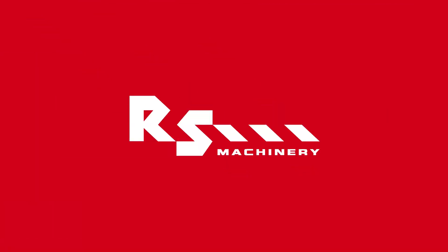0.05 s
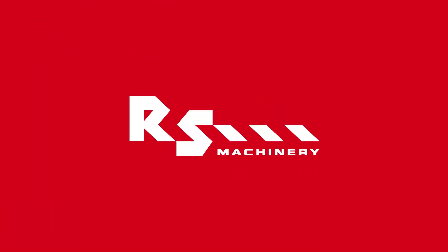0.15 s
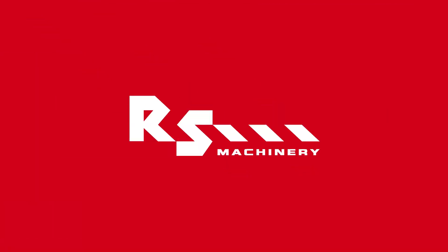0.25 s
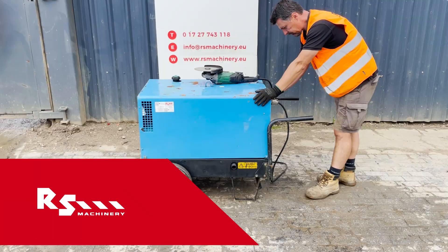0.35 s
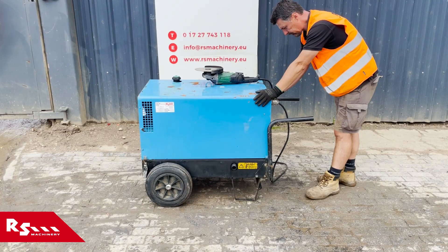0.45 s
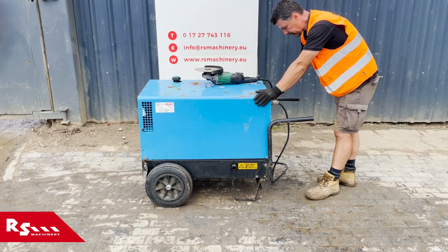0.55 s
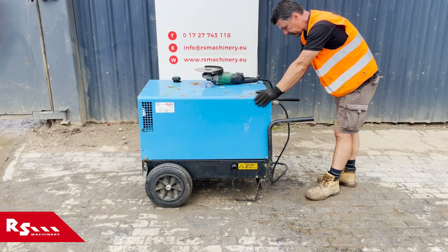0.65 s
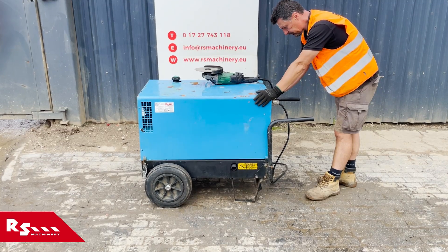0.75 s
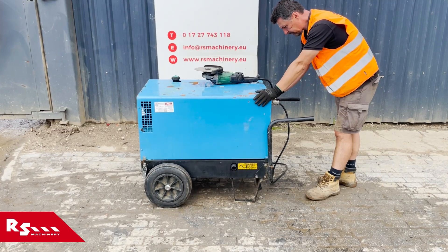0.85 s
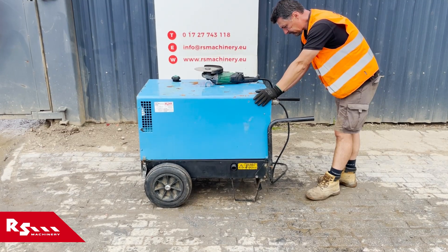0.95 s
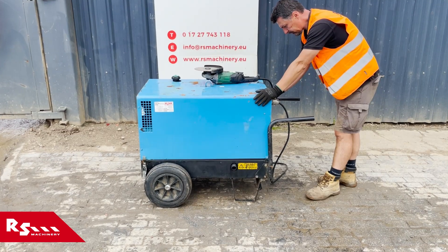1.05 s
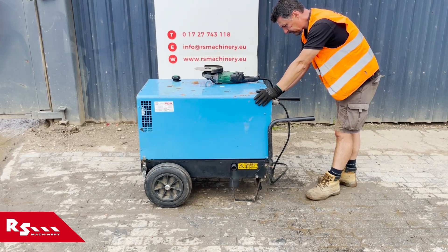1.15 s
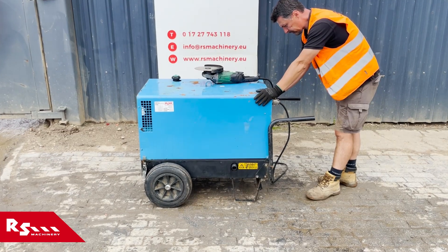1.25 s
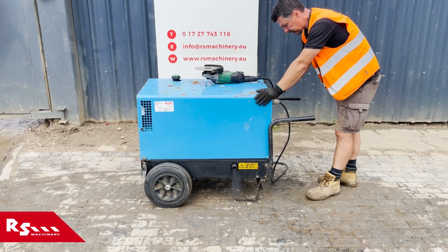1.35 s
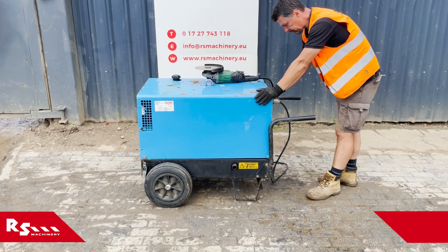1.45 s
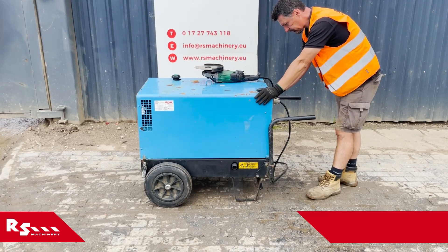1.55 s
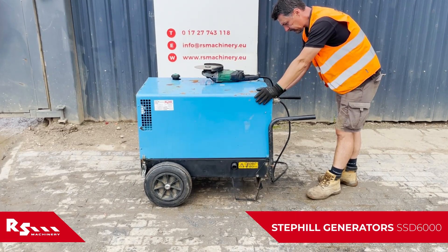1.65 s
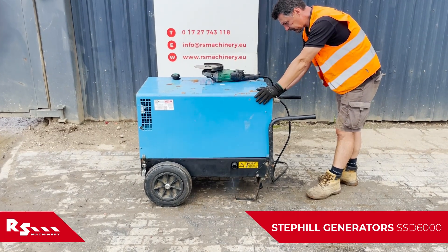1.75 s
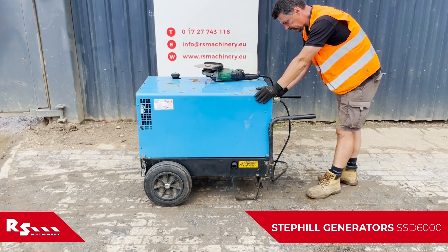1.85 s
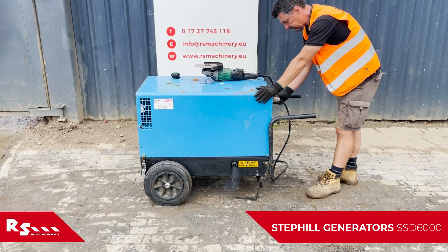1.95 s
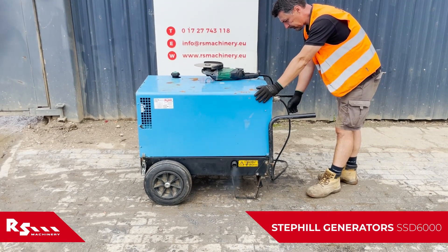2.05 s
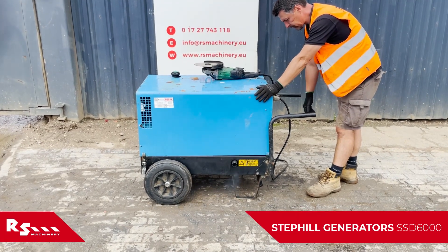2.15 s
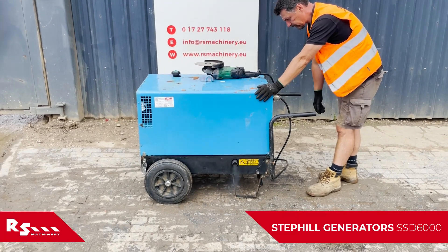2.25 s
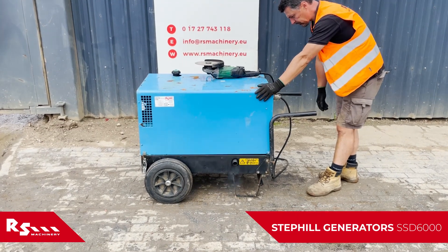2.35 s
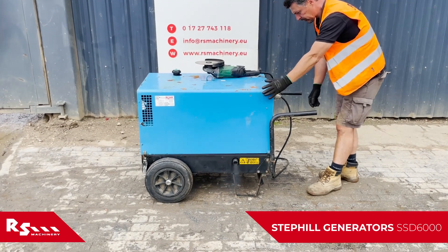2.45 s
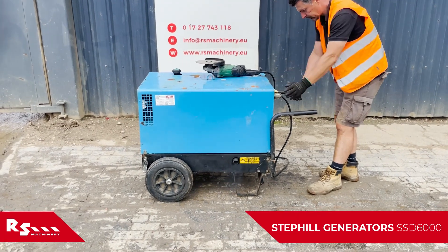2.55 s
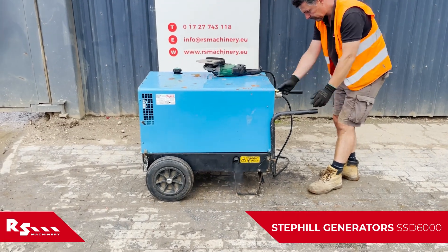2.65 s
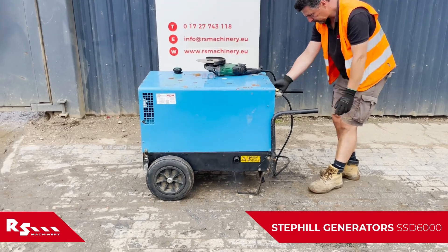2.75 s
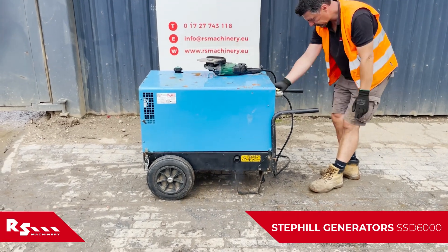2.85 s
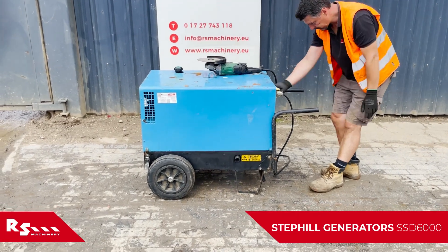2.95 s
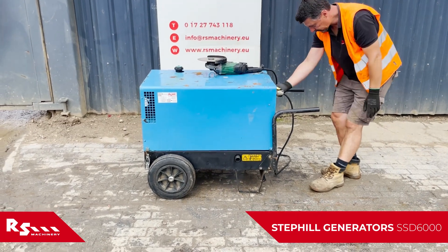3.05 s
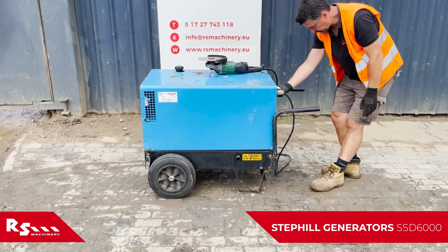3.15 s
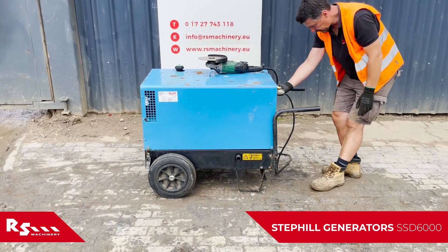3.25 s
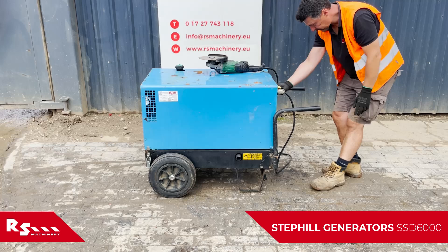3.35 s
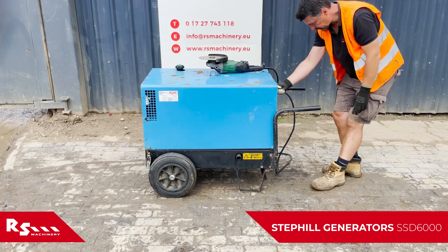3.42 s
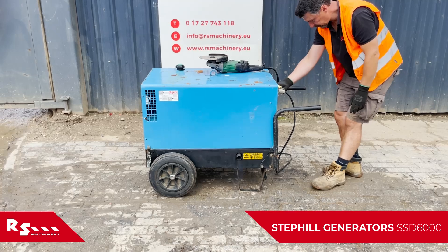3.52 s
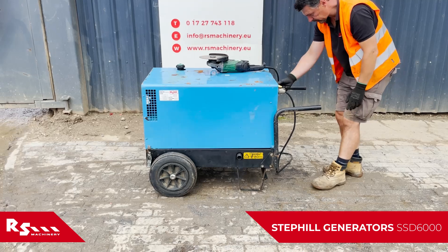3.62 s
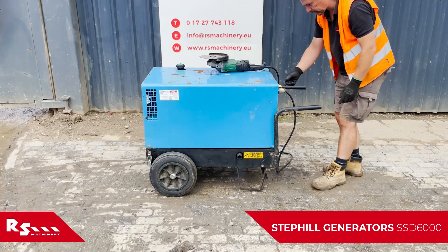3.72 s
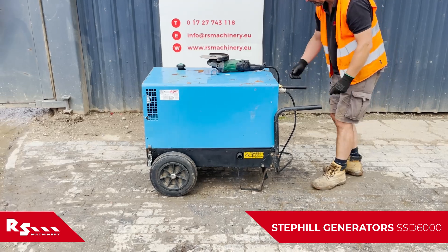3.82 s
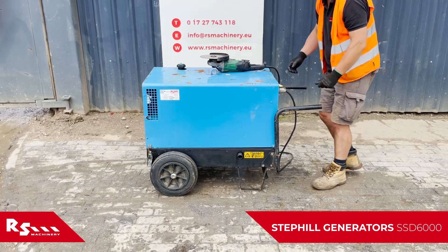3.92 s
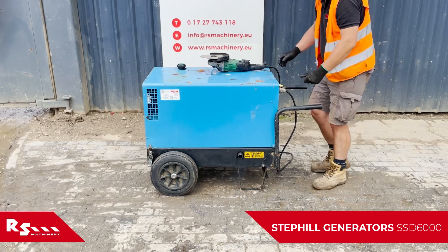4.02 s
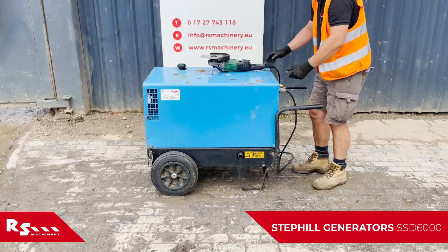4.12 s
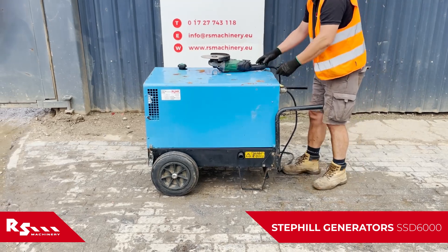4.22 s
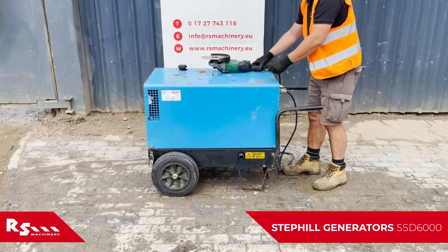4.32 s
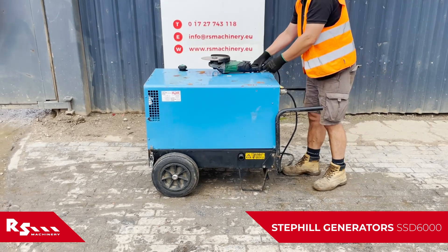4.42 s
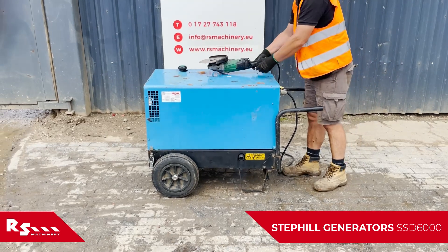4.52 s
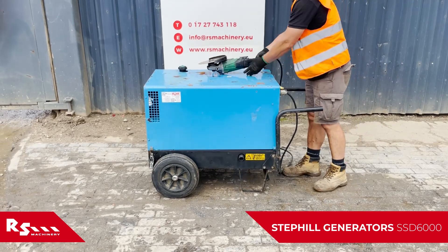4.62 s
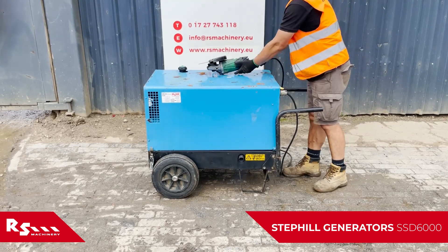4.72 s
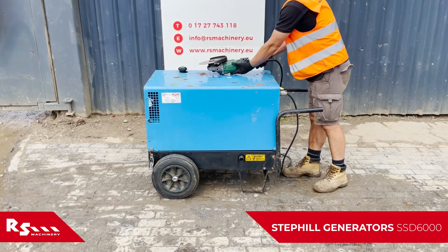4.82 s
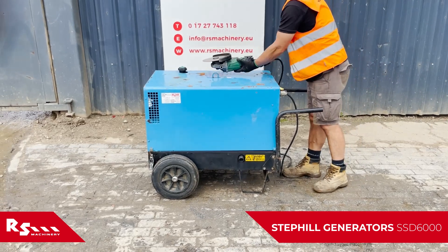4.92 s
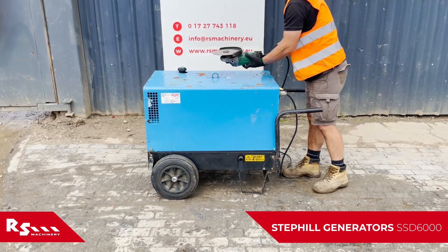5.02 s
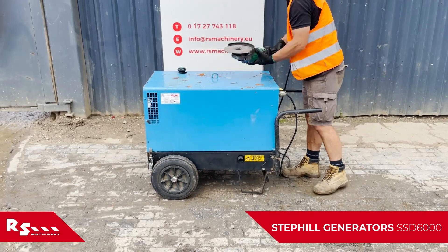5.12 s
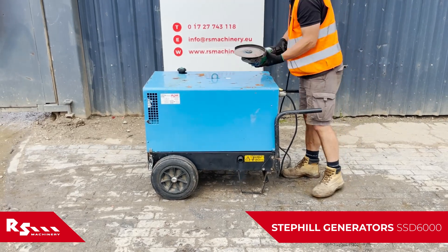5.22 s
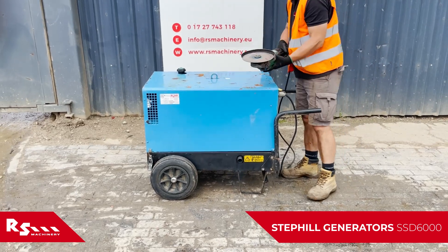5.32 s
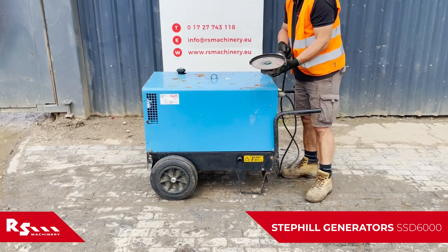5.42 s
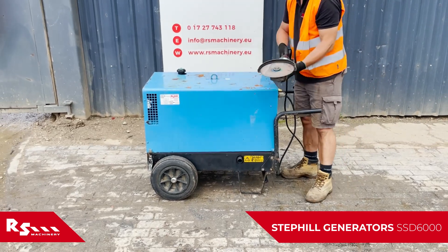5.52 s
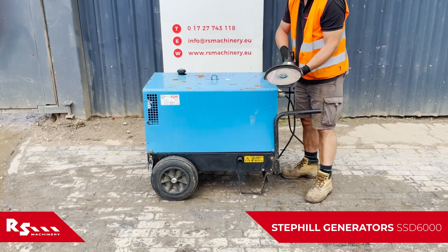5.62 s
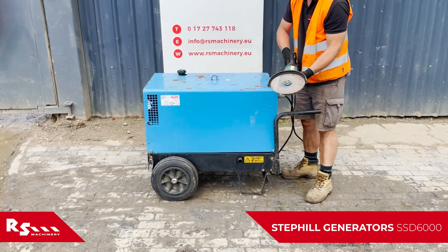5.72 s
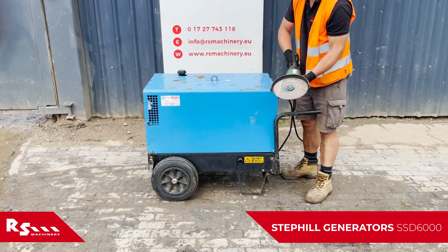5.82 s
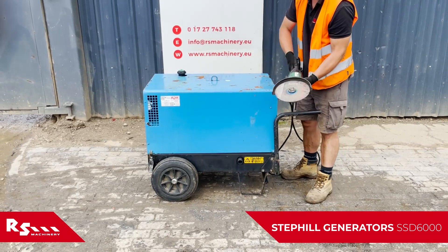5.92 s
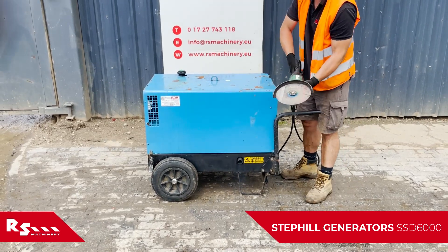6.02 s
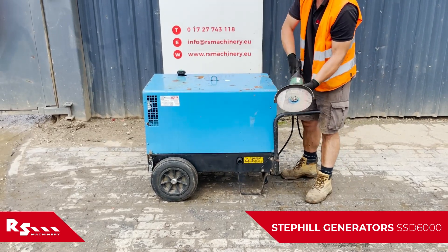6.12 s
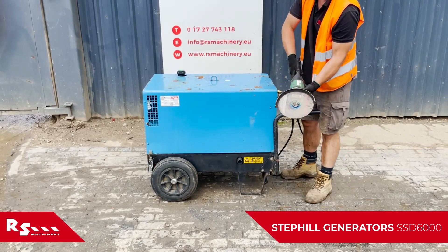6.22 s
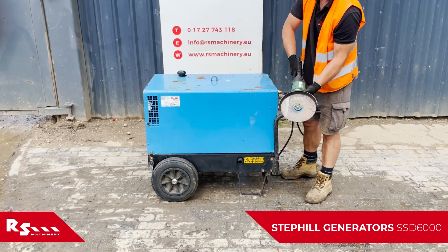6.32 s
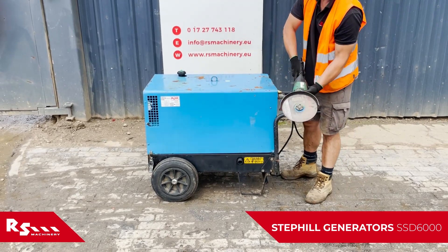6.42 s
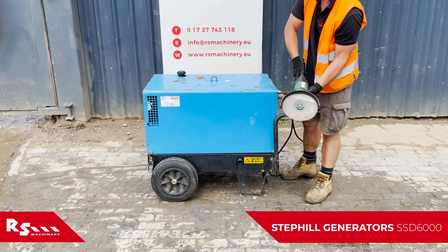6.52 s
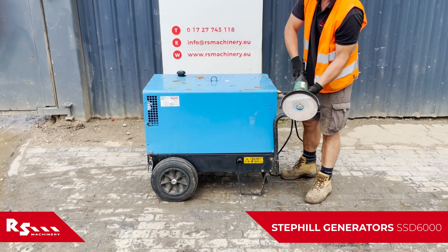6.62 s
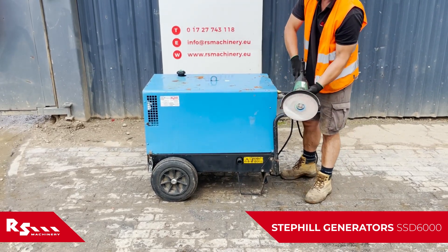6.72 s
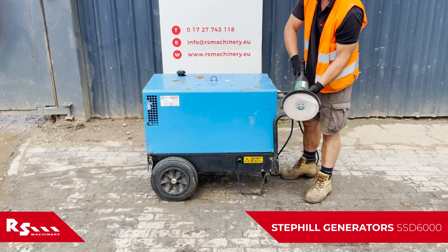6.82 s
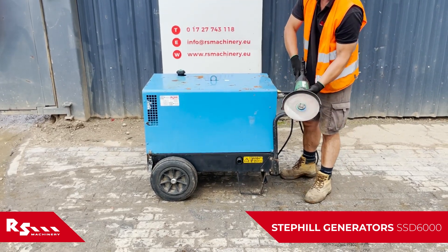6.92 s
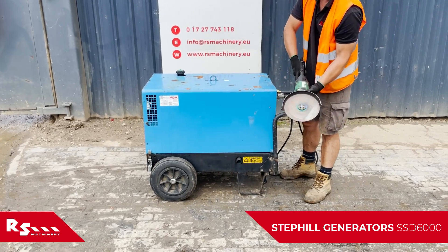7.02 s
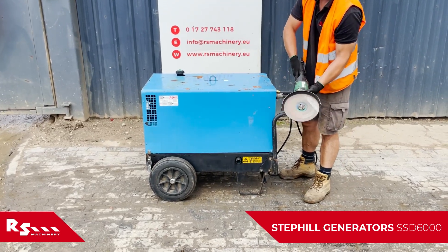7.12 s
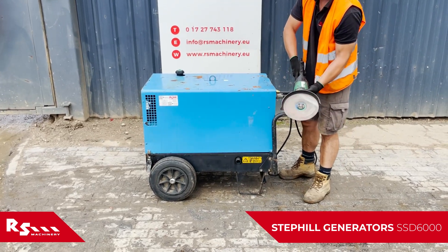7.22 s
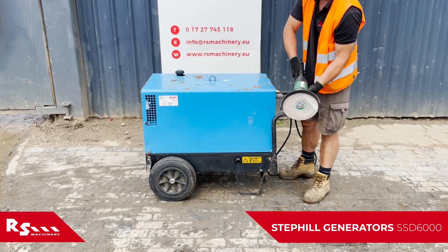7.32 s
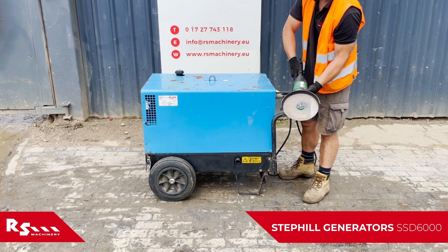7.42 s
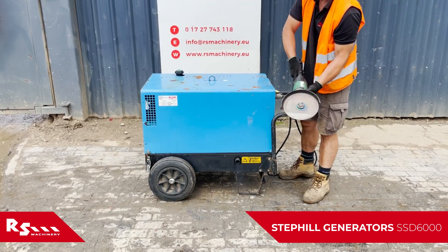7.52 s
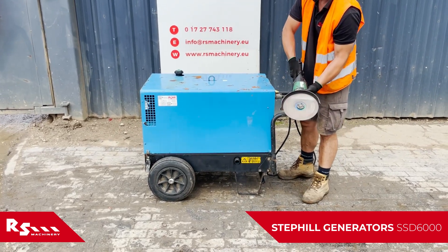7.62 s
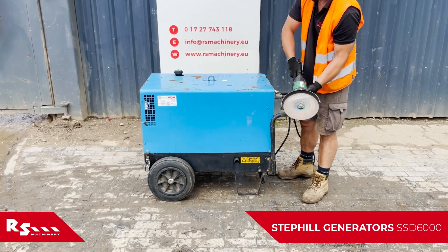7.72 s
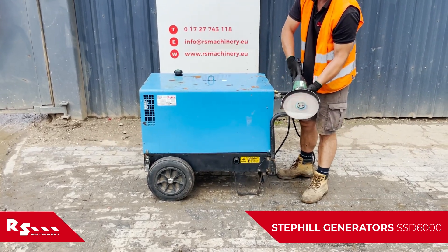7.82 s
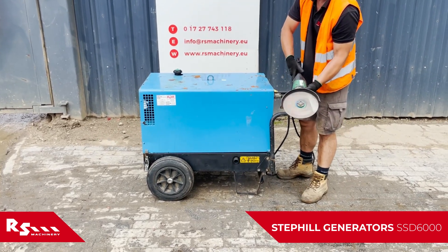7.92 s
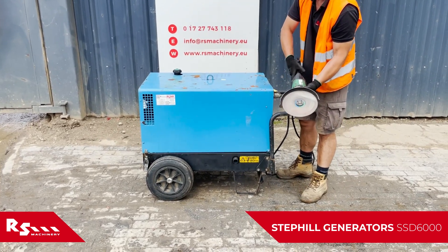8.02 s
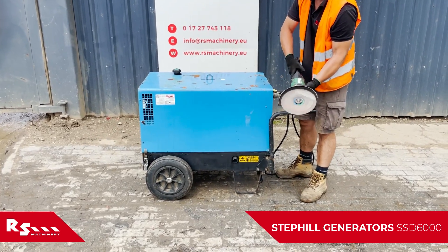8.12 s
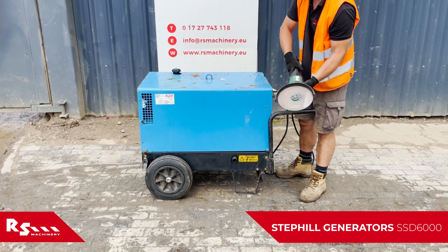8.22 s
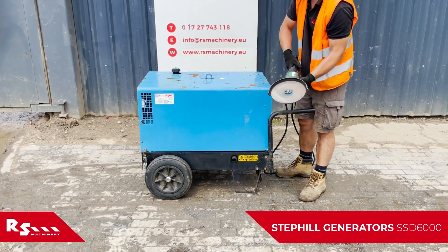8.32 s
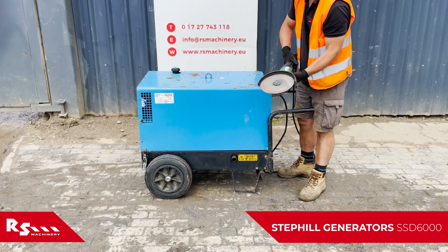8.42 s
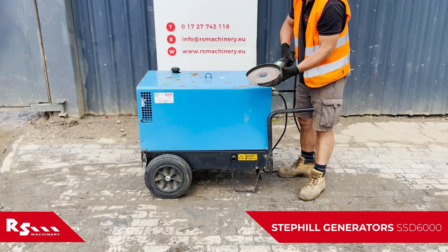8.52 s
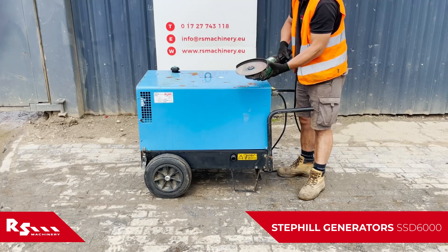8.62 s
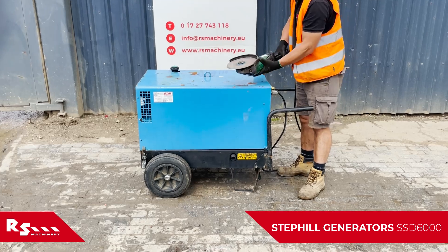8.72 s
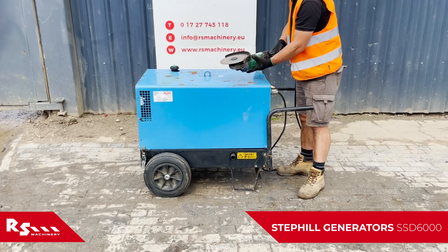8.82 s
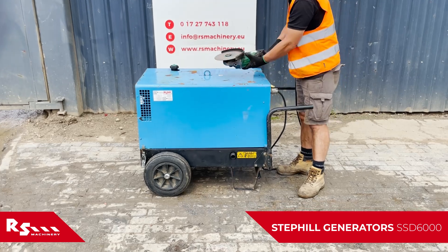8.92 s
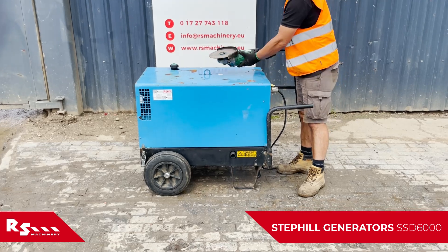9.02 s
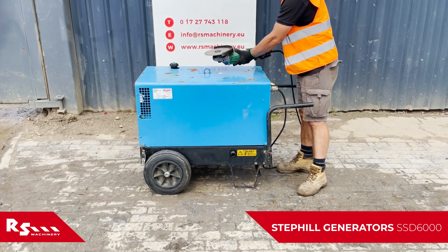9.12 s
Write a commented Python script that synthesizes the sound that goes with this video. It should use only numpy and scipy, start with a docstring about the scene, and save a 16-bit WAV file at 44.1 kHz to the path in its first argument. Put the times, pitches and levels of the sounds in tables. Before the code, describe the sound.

For the first 0.7 seconds a starter clunks and grinds fairly quietly. A single-cylinder diesel generator turns over with low pumping and quickening knocks, catches at about 1.9 seconds and reaches speed by 2.5. It runs on loudly and steadily: a deep booming exhaust, a fast hard clatter, ringing steel panels and a rush of fan air.

At 6.4 seconds an angle grinder starts with a rattling gear jolt and a rasp, whining upward for a third of a second, spinning freely without cutting. It coasts, with a few bright metal ticks between 7.0 and 7.4. A second blip from 7.4 to 7.8 pushes the whine higher. The engine sags slightly under each blip and recovers. The grinder's thin whine and airy hiss slowly fall, with a soft low thump near 8.4, while the generator continues to the end, just past 9 seconds. Heard nearby, outdoors, in stereo.

```python
"""A starter clunks and grinds; a single-cylinder diesel generator catches and settles on its governor.
Its exhaust booms and each firing knocks the block and steel canopy. An angle grinder plugged into it is
blipped twice in free air: its gears jolt, its motor rasps, it whines up and coasts down, and each time
the load pulls the engine speed down a little. Heard outdoors through two nearby microphone ports."""
import sys
import numpy as np
from scipy import signal
from scipy.fft import rfft, irfft, next_fast_len
from scipy.io import wavfile
from scipy.ndimage import map_coordinates

SR = 44100
rng = np.random.default_rng(int(sys.argv[2]) if len(sys.argv) > 2 else 0)


def wrap_up_sound(samples):
    """Save the sound to the file named by the first command line argument, as 16-bit audio."""
    columns = np.atleast_2d(samples).T
    # keep every value between -1 and 1, then stretch to whole-number steps
    tamed = np.clip(columns, -1, 1)
    steps = np.round(tamed * 32767).astype(np.int16)
    wavfile.write(sys.argv[1], SR, steps)


N = 403956

# grinder trigger pulls: on_s, off_s, rasp_db, air_db, engine_sag_hz
TRIGGER = [(6.428, 6.726, -26.5, -26.5, 1.41), (7.405, 7.809, -25.5, -23, .81)]
GOVERNED_HZ, FREE_WHINE_HZ = 25.5, 10867  # engine firing rate, grinder whine at free speed
PUMP_AT_S, CATCH_AT_S, SETTLE_AT_S, SETTLE_S = .87, 1.88, 2.28, 3.2
JOLT_DB, RATTLE_DB, RATTLE_FALL_DB_PER_S = -16.5, -23, 46


def engine_speed():
    """Firing rate in Hz: sags under the grinder's load until the governor brings it back."""
    # unloaded run-up: time_s, firing_hz
    run_up = [(0, 9.75), (.65, 9.17), (1, 12.34), (1.5, 17.95), (2, 23.08), (2.4, 24.89), (3, 25.27),
              (4.5, 25.27), (6.4, 25.45), (9.16, 25.53)]
    recover_s = .5
    sag_hz = sum(drop_hz * ramp(on, off - on) * fade(off, recover_s) for on, off, _, _, drop_hz in TRIGGER)
    return np.interp(clock(), *np.transpose(run_up)) - sag_hz


def exhaust(turns, speed):
    """The cranked engine shakes and pumps; once it fires, low orders boom against fixed drones."""
    # exhaust lines: firing_multiple, level_db
    orders = [(2, -9.5), (3, 1.5), (4, -22.5), (5, -28.5), (6, -16), (9, -22.5), (10, -30), (11, -37.5)]
    # low thumps, the first at the catch: peak_s, level_db
    thump_times = [(1.93, -29.5), (8.38, -21)]
    # canopy rumble: freq_hz, density_db
    rumble_spectrum = [(30, -23), (55, 10), (90, -5.5), (125, -5), (180, 0.5), (245, 1.5), (320, -10),
                       (560, -11), (800, -48), (2000, -70)]
    lead_rad = 1.18 * fade(4.05, .99) * np.array([[-.5], [.5]])  # bass starts wide, right leading
    caught = ramp(CATCH_AT_S, .018)
    shake = amp(-36 - 13.5 * clock())  # starter's first kick
    cranking = (1 - caught) * (shake + amp(-35.5) * ramp(PUMP_AT_S, .24))
    running = caught * amp(-13 - 2.5 * fade(SETTLE_AT_S, SETTLE_S)) * speed ** 2.4
    thumps = hits(thump_times, rise_s=.033, decay_s=.11)

    valve_turns = turns - .46 + lead_rad / (2 * np.pi * 3)  # opens after the knock
    boom = amp(-.97) * running * unit(lines(valve_turns, orders, waver_db=.5, spread_rad=2))
    beat = (amp(-2.5) * cranking + amp(-11.5) * running) * drone(61, wander_rad=1, lead_rad=lead_rad)
    pumping = amp(-3) * cranking * noise([(30, -35), (55, -11), (75, 2), (110, 7), (250, -41)])

    blur = unit(ring(noise([(60, -17), (105, 0), (135, -1), (200, -42)]), [(124.5, 17, 0)]))
    swell_db = 5.5 * np.exp(-((clock() - 2.7) / .84) ** 2)  # as the engine reaches speed
    hollow_gain = amp(-4) * cranking + amp(-33.5 + swell_db + 2.6 * wobble(2.02)) * caught
    hollow_gain += amp(-7) * thumps
    hollow = hollow_gain * (drone(121.5, wander_rad=.92, lead_rad=lead_rad) + amp(-4.5) * blur)

    puffs = strokes(turns, rise_s=.0013, decay_s=.016, scatter_db=1.5, uneven_db=.5)
    rumble_gain = amp(-27.5 - 4 * fade(SETTLE_AT_S, 1) - 1.3 * (1 - caught)) * speed ** 1.16
    rumble = np.hypot(rumble_gain, amp(-8.5) * thumps) * unit((.49 + puffs) * noise(rumble_spectrum))
    analytic = signal.hilbert(pumping + rumble, next_fast_len(N))[:, :N]
    return boom + beat + hollow + np.real(analytic * np.exp(1j * lead_rad))


def clatter(turns, speed):
    """Each combustion knock rings block and panels, over the rush of gears and cooling fan."""
    # combustion knock: freq_hz, density_db
    knock_spectrum = [(200, -16), (600, -2.5), (1100, 3), (1800, -1.5), (3000, 1.5), (4000, -3), (5000, -4),
                      (5600, -12), (8500, -7), (11300, -8), (13000, -23), (15500, -38)]
    # block and cover: freq_hz, width_hz, gain_db
    block_modes = [(2740, 200, -3), (3047, 145, 5), (3780, 145, 6), (4885, 180, 3), (7120, 770, -4)]
    # canopy panels: freq_hz, width_hz, gain_db
    panel_modes = [(1409, 28, 5.5), (1861, 18, -0.5), (2847, 144, -7.5), (4010, 140, -25), (4960, 28, -30)]
    # gears and fan: freq_hz, density_db
    rush_spectrum = [(166, -20.5), (500.0, -1.5), (800.0, -2.5), (1100.0, -6), (1250.0, -13),
                     (1700.0, -13.5), (2200.0, -12.5), (3000.0, -14.5), (4000.0, -19), (5000.0, -20),
                     (5600.0, -25), (8500.0, -21), (11300.0, -29.5), (13000.0, -35), (15500.0, -50)]
    turning = ramp(.27, .65)
    full_fuel = ramp(1.09, .18) * fade(2.15, .18)  # until the governor cuts back
    hardening_db = (6 + 3.5 * ramp(CATCH_AT_S, .15)) * full_fuel
    force = turning * amp(-34 - 3.5 * fade(SETTLE_AT_S, SETTLE_S) + hardening_db) * speed ** .16
    grit = amp(2.2 * wobble(700))
    slaps = grit * strokes(turns, rise_s=.0042, decay_s=.0069, scatter_db=1.1, uneven_db=0)
    knock = noise(knock_spectrum)
    block = amp(-4.5 + 1.8 * full_fuel) * unit(ring(noise(), block_modes))
    blows = strokes(turns, rise_s=.0045, decay_s=.014, scatter_db=-1, uneven_db=-.5)
    panels = amp(-43) * unit(ring(force * amp(-4 * full_fuel) * blows * noise(), panel_modes))
    rush = turning * amp(-36 + .7 * full_fuel + 1.7 * wobble(250)) * speed ** .91 * noise(rush_spectrum)
    return force * slaps * (knock + block) + panels + rush


def starter():
    """The starter gear clunks and grinds, with a faint hum and whistle, until the engine takes over."""
    # gear clunks: peak_s, level_db
    clunk_times = [(.068, -34.5), (.205, -37), (.256, -33.5), (.346, -34.5), (.42, -36.5), (.492, -41.5),
                   (.524, -43), (.636, -39)]
    # gear grinding: freq_hz, density_db
    crank_spectrum = [(40, -31), (120.0, -9), (250.0, -13), (400.0, -17.5), (700.0, -4), (1100.0, -13),
                      (2000.0, -17.5), (3800.0, -20), (5000.0, -23.5), (5600.0, -25), (8500.0, -22.5),
                      (11800.0, -30), (13000.0, -41), (15500.0, -51)]
    blows = hits(clunk_times, rise_s=.011, decay_s=.022)
    grind_gain = np.hypot(amp(-43), amp(.5) * blows) * fade(1, 1)
    grind = grind_gain * amp(1.9 * wobble(150)) * noise(crank_spectrum)
    whistle = amp(-64.5) * unit(ring(noise(), [(11600, 390, 0)]))
    hum = amp(-50.5) * ramp(PUMP_AT_S, .08) * drone(392, wander_rad=3.3, lead_rad=0)
    clunks = amp(-6) * blows * unit(ring(noise(crank_spectrum), [(730, 150, 0)]))
    return grind + clunks + (whistle + hum) * fade(1.4, .2)


def grinder(turns):
    """The motor pulses on every half wave of the supply; its whine is weaker under power."""
    whine_hz = spindle()
    half_waves = np.cos(2 * np.pi * turns * 4)
    power = sum(amp(db) * ramp(on, .0048) * fade(off, .022) for on, off, db, *_ in TRIGGER)
    driven = power * rasp(whine_hz, half_waves) + jolt(half_waves)
    return driven + fan_and_guard(whine_hz) + amp(-10 * power / power.max()) * whine(whine_hz)


def spindle():
    """Whine pitch in Hz: climbs toward free speed under power, coasts down slowly."""
    spin_up_s, coast_s = .22, 4.65
    t, hz = clock(), np.zeros(N)
    for on, off, *_ in TRIGGER:
        gap_hz = FREE_WHINE_HZ - hz[round(on * SR)]
        powered_hz = FREE_WHINE_HZ - gap_hz * np.exp(-np.clip(t - on, 0, off - on) / spin_up_s)
        hz = np.where(t < on, hz, powered_hz * np.exp(-np.maximum(t - off, 0) / coast_s))
    return hz


def rasp(whine_hz, half_waves):
    """Motor noise and a gritty, climbing gear tone, chopped by the supply."""
    # driven motor and gears: freq_hz, density_db
    drive_spectrum = [(233, -30), (700.0, -4), (1100.0, -5), (1500.0, 0), (2500.0, -6), (3600.0, -3.5),
                      (4200.0, -2.5), (5000.0, -7), (5700.0, -32), (8500.0, -17), (13000.0, -48)]
    mesh = noise(drive_spectrum)
    mesh += amp(-.5) * unit(ring(noise(), [(3630, 56, -.92), (3890, 57, -.21), (4170, 44, -1)]))
    tooth_hz = .44 * whine_hz * (1 + .0324 * wobble(400))
    buzz = np.sqrt(2) * np.sin(2 * np.pi * np.cumsum(tooth_hz) / SR)
    mesh += amp(-5) * np.clip(whine_hz / 7500, 0, 1) ** 6 * buzz
    return unit(amp(2.6 * half_waves + 3.3 * wobble(500)) * mesh)


def jolt(half_waves):
    """Gears rattle and ring the disc as the motor snatches it from rest."""
    # disc and guard: freq_hz, width_hz, gain_db
    disc_modes = [(609, 23, -0.5), (790, 49, -11.5), (1490, 50, -5.5), (1900, 73, -9), (2800, 37, -15),
                  (3930, 54, -14), (4650, 210, -25)]
    start_s = TRIGGER[0][0]
    snatch = amp(JOLT_DB) * fade(start_s + .09, .04)
    rattle = amp(RATTLE_DB - RATTLE_FALL_DB_PER_S * np.maximum(clock() - start_s, 0))
    envelope = np.sqrt(ramp(start_s, .019)) * np.maximum(snatch, rattle)
    teeth = amp(2 * half_waves) * noise([(250, -28), (550, 1), (4500, -2), (6000, -16), (15000, -40)])
    growl = noise([(300, -25), (600, -4), (1100, -5.5), (1500, 7.5), (2000, -8), (2500, -6),
                   (5000, -17), (7000, -24), (11000, -26), (15000, -56)])
    return envelope * (amp(-2.5) * unit(ring(teeth, disc_modes)) + amp(.88 * half_waves - 1) * growl)


def fan_and_guard(whine_hz):
    """Cooling air and guard ring follow spindle speed; both drop as the tool is turned away."""
    # cooling air: freq_hz, density_db
    air_spectrum = [(266, -21), (800.0, -1), (1150.0, -5.5), (1450.0, -1), (1750.0, -0.5), (2100.0, -6.5),
                    (2600.0, -3.5), (4300.0, -0.5), (5200.0, -8.5), (5700.0, -13), (8500.0, -3.5),
                    (11500.0, -10.5), (13000.0, -22), (15500.0, -29)]
    speed, away = whine_hz / FREE_WHINE_HZ, ramp(8.66, .28)
    air_db = TRIGGER[0][3]
    for on, off, _, db, _ in TRIGGER[1:]:
        air_db = air_db + (db - air_db) * ramp(on, off - on)
    flutter_db = .83 * wobble(28) + .52 * wobble(400)
    air = amp(air_db + .5 - 3 * away + flutter_db) * speed ** 1.75 * noise(air_spectrum)
    vibration = noise([(700, -16), (1400, 1), (2100, 2), (5000, -18)])
    guard = unit(ring(vibration, [(1446, 51, 0), (2033, 47, -3.5)]))
    return air + amp(-33 - 2 * away + 2.1 * wobble(25)) * speed ** 1.44 * guard


def whine(hz):
    """Fluttering armature and gear tones swell as they cross housing resonances."""
    # armature and gear tones: whine_multiple, level_db
    partials = [(.44, -17), (.589, -17), (0.999, -1.5)]
    housing = [(8600, 130, 14), (4300, 250, 12), (5700, 400, -9)]  # freq_hz, half_width_hz, gain_db
    housing_db = lambda f: sum(db / (1 + ((f - centre) / width) ** 2) for centre, width, db in housing)
    phase = 2 * np.pi * np.cumsum(hz * (1 + .0038 * wobble(300))) / SR
    flutter_db = 2.2 * wobble(12)
    tones = sum(amp(db + housing_db(k * hz) + flutter_db) * np.sin(k * phase) for k, db in partials)
    return amp(-29.5) * (hz / FREE_WHINE_HZ) ** 1.4 * tones


def ticks():
    """Short, bright ticks of metal while the grinder coasts."""
    # ticks: start_s, level_db
    tick_times = [(7.018, -27), (7.108, -37), (7.302, -27), (7.381, -29)]
    t, decay_s = clock(), .0058
    blows = sum(amp(db) * (t > s) * np.exp(-np.abs(t - s) / decay_s) for s, db in tick_times)
    return blows * unit(ring(noise(), [(9000, 380, 1), (3610, 870, 2)]))


def canopy_hum(turns):
    """Canopy and alternator hum at high engine orders, growing as the engine settles."""
    # hum lines: firing_multiple, level_db
    orders = [(7, -30.5), (8, -38), (12, -47.5), (13, -44), (15, -45.5), (16, -49), (17, -49), (18, -42.5),
              (20, -54.5), (22, -37), (23, -43.5), (24, -53)]
    gain = amp(-1.5 - 3.5 * fade(SETTLE_AT_S, SETTLE_S)) * ramp(1.65, .86)
    return gain * lines(turns, orders, waver_db=1.5, spread_rad=1.2)


def lines(turns, orders, waver_db, spread_rad):
    """Wavering shaft-locked lines; pipe and panels delay those above the third."""
    phase = lambda k: 2 * np.pi * k * turns - spread_rad * max(k - 3, 0) ** 2
    return np.sqrt(2) * sum(amp(db + waver_db * wobble(9)) * np.cos(phase(k)) for k, db in orders)


def strokes(turns, rise_s, decay_s, scatter_db, uneven_db):
    """A swell and decay per firing; uneven_db alternates strong and weak."""
    at = np.flatnonzero(np.diff(np.floor(turns)) > 0)
    blows = np.zeros(N)
    blows[at] = amp(scatter_db * rng.standard_normal(len(at)) + uneven_db * (-1) ** np.arange(len(at)))
    t = np.arange(-SR // 10, SR // 10) / SR
    return signal.fftconvolve(blows, np.exp(np.minimum(t / rise_s, -t / decay_s)), 'same')


def hits(rows, rise_s, decay_s):
    """Envelope of blows: peak_s, level_db."""
    t = clock()
    return sum(amp(db) * np.exp(np.minimum((t - s) / rise_s, (s - t) / decay_s)) for s, db in rows)


def drone(hz, wander_rad, lead_rad):
    """Low note, rms 1, drifting in phase."""
    return np.sqrt(2) * np.sin(2 * np.pi * hz * clock() + wander_rad * wobble(2) + lead_rad)


def noise(spectrum=((1000, 0),)):
    """Stereo noise, rms 1, partly alike at the two ports."""
    # likeness of the ports: freq_hz, correlation
    likeness = [(80, 0.99), (300, 0.95), (1000, 0.75), (1500, 0.57), (2300, 0.43), (4000, 0.82),
                (5600, 0.32), (7000, 0.6), (8300, 1), (8900, 0.99), (9700, 0.67), (13000, 0.8)]
    angle = lambda hz: np.arccos(np.clip(along(likeness, hz), 0, 1)) / 2
    response = lambda hz: amp(along(spectrum, hz)) * [np.cos(angle(hz)), np.sin(angle(hz))]
    mid, side = filtered(rng.standard_normal((2, N)), response)
    return unit(np.array([mid + side, mid - side]))


def ring(x, modes):
    """Causal resonances: freq_hz, width_hz, gain_db."""
    response = lambda f: sum(amp(db) * 1j * f * w / (c * c - f * f + 1j * f * w) for c, w, db in modes)
    return filtered(x, response)


def filtered(x, response):
    """Apply a complex frequency response."""
    size = next_fast_len(N + SR // 2)
    return irfft(rfft(x, size) * response(np.fft.rfftfreq(size, 1 / SR)), size)[..., :N]


def along(points, hz):
    """Interpolate on a log frequency axis."""
    freq_hz, values = np.transpose(points)
    return np.interp(np.log(hz + 1), np.log(freq_hz + 1), values)


def wobble(rate_hz):
    """Smooth random curve."""
    return map_coordinates(rng.standard_normal(int(N * rate_hz / SR) + 4), [clock() * rate_hz])


def ramp(start_s, length_s):
    return np.clip((clock() - start_s) / length_s, 0, 1)


def fade(start_s, length_s):
    return 1 - ramp(start_s, length_s)


def amp(db):
    return 10 ** (np.asarray(db) / 20)


def unit(x):
    return x / np.sqrt(np.mean(x ** 2) + 1e-20)


def clock():
    return np.arange(N) / SR


def scene():
    """One shaft speed drives the engine sounds and sets the grinder's supply frequency."""
    firing_hz = engine_speed()
    turns = np.cumsum(firing_hz) / SR  # one per firing
    speed = firing_hz / GOVERNED_HZ
    generator = starter() + exhaust(turns, speed) + canopy_hum(turns) + clatter(turns, speed)
    return generator + grinder(turns) + ticks()


def record(dry):
    """The two ports differ in phase and level; peaks are rounded off and the band is limited."""
    # port phase: freq_hz, left_lead_rad
    lead = [(75, -.48), (260, -.7), (450, 0), (600, 1), (720, 1.7), (1000, 0.75), (1250, 1.4), (1400, 0),
            (2300, 0.43), (3000, 1), (5250, 0.87), (5750, -1.6), (6400, -1.15), (7600, -2.65),
            (8900, -3.25), (12000, -5.2), (12800, -6.2)]
    # port balance: freq_hz, left_minus_right_db
    tilt = [(150, 0), (400, -0.5), (620, -6.5), (820, 2.5), (1150, -0.5), (1400, 2.5), (2100, 0), (2700, 2),
            (5200, 3.5), (5800, -1), (6900, 3.5), (8400, 0)]
    ceiling, top_hz = .88, 15830
    half = np.array([[.5], [-.5]])
    heard = filtered(dry, lambda hz: amp(half * along(tilt, hz)) * np.exp(1j * half * along(lead, hz)))
    rounded = heard / (1 + np.abs(heard / ceiling) ** 8) ** (1 / 8)
    return filtered(rounded, lambda hz: hz < top_hz)


dry = scene()
out = record(dry)
wrap_up_sound(out)
```